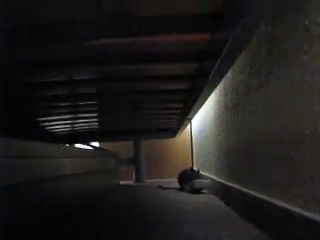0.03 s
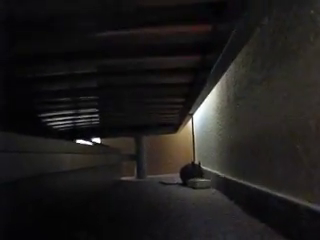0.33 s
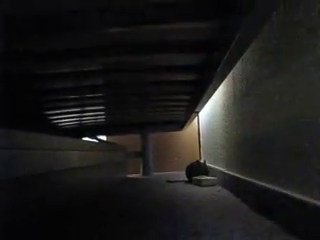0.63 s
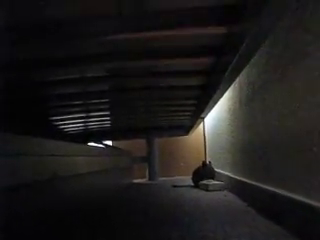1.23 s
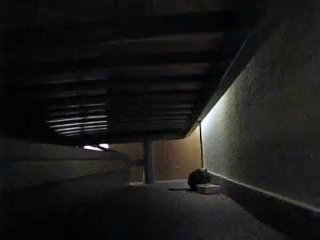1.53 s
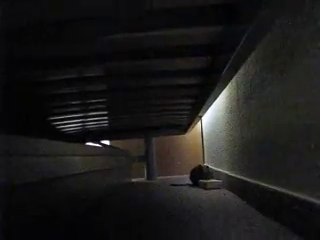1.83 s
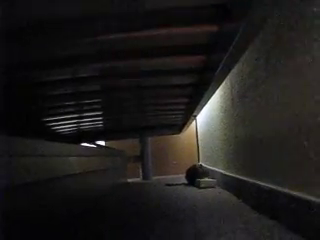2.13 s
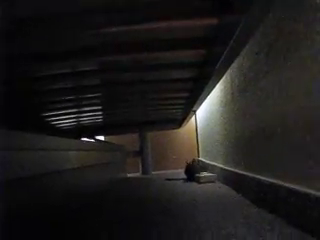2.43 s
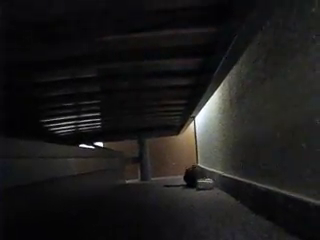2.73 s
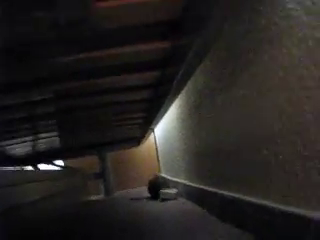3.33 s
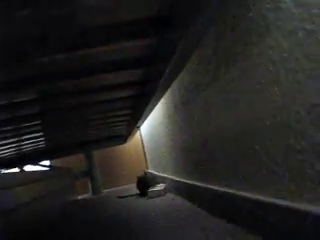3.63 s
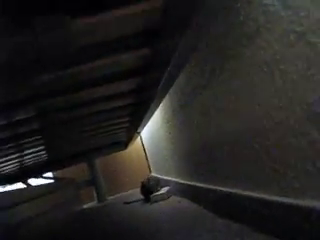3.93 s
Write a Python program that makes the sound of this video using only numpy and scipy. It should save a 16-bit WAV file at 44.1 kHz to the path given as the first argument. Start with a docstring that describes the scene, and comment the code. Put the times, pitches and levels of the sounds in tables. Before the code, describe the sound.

A small rodent nibbles at a box under a bed, making loose runs of dry ticks and crisp rustles. A hand rubs and bumps the floor-level microphone, with one plastic snap near the end, over low rumble and hiss.

```python
"""A small rodent nibbles at a box under a bed, heard from a hand-held camera at floor level.
Its teeth make loose runs of dry ticks, tiny cracks that ring the box, with crisp rustles and fine crackle.
The hand rubs, scuffs and bumps the camera, whose plastic case snaps once near the end.
Under it all lie a low rumble, room hum, hiss and the camera's faint pulsing whine."""
import sys
import numpy as np
from scipy import signal
from scipy.fft import rfft, irfft
from scipy.io import wavfile
from scipy.ndimage import uniform_filter1d

SR = 44100
rng = np.random.default_rng(int(sys.argv[2]) if len(sys.argv) > 2 else 0)


def wav_out(sig):
    """Save sig, one row per channel (or a flat mono array), as 16-bit PCM at SR to the path in sys.argv[1]."""
    wavfile.write(sys.argv[1], SR, np.round(np.clip(np.atleast_2d(sig).T, -1, 1) * 32767).astype(np.int16))


N = 176400

# Tone colours of the noises. Each row: frequency in Hz, relative strength in dB.
AIR_COLOUR = [(30, -18.5), (70, 0), (150, -6.5), (260, -10.5), (380, -14), (540, -18), (750, -14.5),
              (980, -17.5), (1580, -20.5), (2320, -22.5), (4500, -24.5), (7000, -27), (11500, -30),
              (16000, -38.5)]
RUMBLE_COLOUR = [(10, 0.5), (22, -9.5), (31, 4), (42, -12.5), (60, -2), (100, -9), (150, -13), (200, -26.5),
                 (300, -29.5), (1000, -59)]
RUB_COLOUR = [(150, -7), (400, -2.5), (800, 1.5), (1200, -0.5), (1650, -6), (2400, -0.5), (4300, -9.5),
              (7000, -16), (16000, -24)]
TICK_COLOUR = [(150, -31), (400, -18), (650, 4.5), (1100, -6.5), (1750, 0.5), (2200, 3.5), (2700, -3.5),
               (3500, -11.5), (4200, -7.5), (4900, -32), (7000, -28), (9500, -38), (16000, -38)]
EDGE_COLOUR = [(150, -67), (2500, -15), (4000, 2), (5600, -10), (7000, -11), (9500, -14), (16000, -32)]  # the hard edge of brighter ticks
CRISP_COLOUR = [(150, -73), (2500, -4), (4800, 2), (7000, 2.5), (8500, 3), (11500, 10), (16000, -1.5)]  # crackle, and the treble of ticks and rustles
RUSTLE_COLOUR = [(150, -5), (400, -0.5), (650, 0), (1200, 2.5), (1600, -3.5), (2150, 1), (2550, 1),
                 (3050, 5.5), (3550, -4.5), (4100, 1), (6500, -12.5), (9000, -10.5), (16000, -69)]
CASE_CRACK_COLOUR = [(150, -42), (500, -3), (1150, 3), (1700, -10), (2500, 1), (5000, -10), (9000, -12),
                     (16000, -16)]
# How alike left and right are. Each row: frequency in Hz, likeness from 0 (unrelated) to 1 (the same).
LIKENESS = [(60, 0.77), (130, 1), (290, 0.84), (640, 0.49), (1400, 0.47), (3100, 0.062), (16000, 0.022)]
# The room's hum. Each row: pitch in Hz, level in dB.
HUM_TONES = [(31, -57), (48.8, -48.5), (199.4, -59.5)]
# How rumble and rubbing swell and fade. Each row: time in seconds, level in dB.
RUMBLE_LEVELS = [(0, -46), (.4, -49), (.75, -45), (1.2, -54), (1.55, -53), (1.8, -46.5), (2.1, -50.5),
                 (2.35, -44), (2.7, -47.5), (3.08, -41.5), (3.4, -45.5), (3.8, -46.5), (4, -44.5)]
RUB_LEVELS = [(0, -50), (.13, -54.5), (.22, -53.5), (.35, -50.5), (.42, -64), (.62, -58), (.7, -56.5),
              (.92, -53), (1.02, -64), (1.45, -60), (1.86, -55), (1.96, -56), (2.1, -54), (2.4, -59.5),
              (2.52, -52.5), (2.68, -59.5), (3.0, -53), (3.09, -54.5), (3.135, -44), (3.19, -50),
              (3.29, -52.5), (3.48, -57.5), (3.68, -51.5), (3.88, -59.5), (4, -53)]
# Slides of the hand. Each row: start and length in seconds, level in dB, resonance in Hz.
SCUFFS = [(0, 0.27, -56, 754), (0.214, .21, -55, 850), (1.356, 0.33, -63, 960), (3.091, 0.26, -55.5, 1110)]
# Ticks of the teeth. Each row: start in seconds, level in dB, relative treble in dB, leftward lean in dB.
TICKS = [(0.0223, -27, -11, 8), (.6719, -32, -20, 0), (0.7023, -33, -12, -2), (0.7069, -24.5, -10, -4),
         (0.7686, -32, -16, -2), (0.8523, -29, -13, -5), (0.8593, -27.5, -27, 1), (0.8720, -25.5, -13, -1),
         (0.8853, -26, -12.5, 1), (1.1123, -29, -27, 4), (1.242, -38, -35, 13), (1.618, -30, -39, 8),
         (1.6445, -36, -8, -2), (1.6718, -36, -10, -4), (1.694, -39.5, -5, 1), (1.712, -36, -23, -10),
         (1.7434, -42, -11, -6), (1.7894, -38.5, -6, -2), (1.835, -30.5, -20, -2), (1.8498, -26.5, -14, -1),
         (1.8702, -24, -16, -3), (1.8747, -28.5, -27, 1), (1.889, -29.5, -18, -1), (1.9973, -34.5, 1, -2),
         (2.0185, -30, -12.5, -2), (2.0352, -27, -25, 3), (2.0595, -29, -32, -4), (2.0879, -28.5, -35, -8),
         (2.175, -27.5, -19, -4), (2.2452, -31.5, -12, -4), (2.3163, -38, -13, -9),
         (2.3642, -34.5, -20, -4), (2.415, -41, -10, -2), (2.4776, -33, -18, -5), (2.5368, -24.5, -21, -1),
         (2.557, -51, -13, -6), (2.566, -24, -20, -2), (2.6202, -41.5, 0, 2), (2.7363, -46.5, 4, -1),
         (2.769, -32.5, -25, -6), (2.814, -36, 1.5, -4), (2.957, -30, -28, 0), (2.9904, -29.5, -16.5, 1),
         (3.074, -33.5, -12, -4), (3.216, -27, -28, -12), (3.326, -28, -11, -5), (3.3781, -23, -7.5, -3),
         (3.555, -33, -17, -6), (3.7417, -35, -31, 4), (3.9743, -35, -39, -21)]
# Ringing tones of the box and of a knock. Each row: pitch in Hz, seconds to fade 60 dB, strength in dB.
BOX_TONES = [(1890, 0.0034, -15.5), (2270, 0.0096, -9.5), (2810, 0.0082, -11.5)]
KNOCK_TONES = [(668, 0.041, -3), (1220, 0.038, -6.5), (2030, 0.021, -17), (2120, 0.037, -3),
               (2550, 0.025, -9), (2960, .02, -13), (3950, 0.018, -9)]
# Bumps of the hand. Each row: start in seconds, level in dB, pitch in Hz, relative knock in dB.
BUMPS = [(0.157, -34, 188, -4.5), (0.886, -33.5, 175, 4), (2.891, -32, 227, -37), (2.899, -27.5, 112, -35),
         (3.171, -49, 195, 6)]
# Rustles. Each row: start and length in seconds, level in dB, relative treble in dB.
RUSTLES = [(0.262, 0.021, -42, -14), (0.283, 0.011, -47, -1.5), (0.3312, 0.0032, -40, -8),
           (0.684, 0.0097, -47.5, -7), (0.718, 0.009, -39, 2), (0.802, 0.0075, -48.5, -1.5),
           (0.824, 0.01, -53.5, 4), (0.837, 0.044, -53.5, -0.5), (0.8833, 0.0058, -35, -9),
           (1.854, 0.0029, -45, -18), (2.5488, 0.0034, -38, -10), (2.558, 0.0014, -40.5, 7),
           (3.383, 0.0077, -37.5, -10), (3.755, 0.0043, -43.5, -4.5)]
# Tones of the camera case. Each row: pitch in Hz, seconds to fade 60 dB, left and right strength in dB.
CASE_TONES = [(512, 0.018, -23.5, -24), (730, .042, -29, -26.5), (1030, 0.025, -15, -30),
              (1284, 0.025, -15.5, -27), (2045, 0.03, -37, -22.5), (2340, 0.023, -19, -15),
              (2850, 0.0053, -16.5, -8.5), (3230, 0.013, -28, -14), (3900, 0.01, -30, -14.5),
              (4580, 0.012, -26, -10), (5420, .005, -15, -5.5), (6600, 0.011, -30, -21),
              (7840, 0.0026, -18, -8), (9200, 0.0037, -15, -9.5), (12100, .003, -14, -22)]

GRAINS_PER_S, RUB_SPREAD_DB = 2500, 2
TICK_DECAY_S = 0.0011


def undb(db):
    """Turn decibels into a gain."""
    return 10 ** (np.asarray(db) / 20)


def unit(x):
    """Scale to an average power of 1."""
    return x / np.sqrt(np.mean(x ** 2) + 1e-20)


def curve(rows):
    """Gain over time from (seconds, dB) points."""
    return undb(np.interp(np.arange(N) / SR, *np.array(rows).T))


def over_hz(points, size):
    """Join (Hz, value) points on a log-frequency axis."""
    hz, value = np.array(points).T
    return np.interp(np.log(np.arange(size // 2 + 1) * SR / size + 1), np.log(hz), value)


def colour(x, points):
    """Give a sound a tone colour; white noise keeps its power."""
    size = x.shape[-1]
    cepstrum = irfft(np.log(unit(undb(over_hz(points, size)))), size)
    # Folding it makes the filter ring only after a sound, never before.
    cepstrum[1:size // 2] *= 2
    cepstrum[size // 2 + 1:] = 0
    return irfft(rfft(x) * np.exp(rfft(cepstrum)), size)


def stereo_noise(likeness, size):
    """Left and right noise, as alike as asked."""
    mid, side = rfft(rng.standard_normal((2, size)))
    mid, side = mid * np.sqrt((1 + likeness) / 2), side * np.sqrt((1 - likeness) / 2)
    return irfft(np.array([mid + side, mid - side]), size)


def wander(rate):
    """A smooth random drift, about 1 in size."""
    width = int(SR / rate)
    drift = uniform_filter1d(rng.standard_normal(N), width, mode="wrap")
    return unit(uniform_filter1d(drift, width, mode="wrap"))


def grains(rate, spread_db, size):
    """The loudness outline of many tiny, uneven slips."""
    happens = rng.random(size) < rate / SR
    slips = happens * undb(spread_db * np.minimum(rng.exponential(size=size), 5))
    return unit(np.sqrt(np.abs(uniform_filter1d(slips ** 2, size=24))))


def burst(shape, points, likeness=0.59):
    """Coloured stereo noise with the outline and energy of a shape."""
    noise = shape * stereo_noise(likeness, len(shape))
    return unit(colour(noise, points)) * np.sqrt(np.mean(shape ** 2))


def ring(t, hz, fade_s):
    """A struck tone that falls 60 dB in fade_s."""
    t = np.maximum(t, 0)
    return np.sin(2 * np.pi * hz * t) * np.exp(-np.log(1000) * t / fade_s)


def thin_bass(x, below_hz=328):
    """Thin out the bass that a small object cannot give off."""
    return signal.sosfilt(signal.butter(2, below_hz, "high", fs=SR, output="sos"), x)


def add(out, start, sound):
    """Mix a sound in at its time."""
    i = max(int(start * SR), 0)
    out[:, i:i + sound.shape[-1]] += sound[..., :N - i]


def background(air_db=-51, waver_db=0.5):
    """Hissing room air, handling rumble and a wavering hum, a little stronger on the left."""
    t = np.arange(N) / SR
    air = undb(air_db) * unit(colour(stereo_noise(over_hz(LIKENESS, N), N), AIR_COLOUR))
    rumble = curve(RUMBLE_LEVELS) * unit(colour(stereo_noise(0.94, N), RUMBLE_COLOUR))
    hum = np.zeros(N)
    for hz, db in HUM_TONES:
        peak = undb(db + waver_db * wander(11)) * np.sqrt(2)
        hum += peak * np.sin(2 * np.pi * hz * t + 0.59 * wander(2.2))
    return (air + rumble + hum) * undb([[.7], [-.7]])


def whine(hz=7867, db=-61.5, frames_per_s=29.97, on_share=0.53):
    """The camera's electronics whine in one short burst per picture frame."""
    t = np.arange(N) / SR
    frames = frames_per_s * (t - .007)
    is_on = np.cos(2 * np.pi * frames) > np.cos(np.pi * on_share)
    flip = (-1.) ** np.floor(frames + .5)  # every other burst is upside down
    return undb(db) * uniform_filter1d(is_on * flip, size=40) * np.sin(2 * np.pi * hz * t)


def rubbing(flutter_db=1.5):
    """The hand rubs the camera: soft, grainy friction that swells and fades."""
    slips = stereo_noise(over_hz(LIKENESS, N), N) * grains(GRAINS_PER_S, RUB_SPREAD_DB, N)
    flutter = undb(flutter_db * np.tanh(wander(86)))
    return unit(colour(slips, RUB_COLOUR) * flutter) * curve(RUB_LEVELS)


def scuffs():
    """The hand slides: grainy friction through one hollow resonance."""
    out = np.zeros((2, N))
    for start, length, db, hz in SCUFFS:
        size = int(length * SR)
        slips = stereo_noise(0.89, size) * grains(900, RUB_SPREAD_DB, size)
        hollow = signal.iirpeak(hz, Q=1.75, fs=SR)
        sound = unit(signal.lfilter(*hollow, signal.lfilter(*hollow, slips)))
        add(out, start, undb(db) * sound * signal.windows.tukey(size, .5))
    return out


def ticks(t, attack_s=0.0004, tail_s=0.011, delay_s=0.000992, pitch_scatter=0.066):
    """Each bite is a millisecond crack that briefly rings the box, at slightly different pitches."""
    out = np.zeros((2, N))
    decay = np.exp(-t / TICK_DECAY_S) + undb(-15.5) * np.exp(-t / tail_s)
    shape = np.minimum(t / attack_s, 1) * decay
    for start, db, treble_db, lean_db in TICKS:
        box = sum(undb(tone_db) * ring(t, hz * (1 + pitch_scatter * rng.standard_normal()), fade_s)
                  for hz, fade_s, tone_db in BOX_TONES)
        # Brighter ticks ring the box less and, up to a limit, have a harder edge.
        box *= undb(-0.32 * max(treble_db + 25, 0))
        crack = undb(-10) * burst(shape, TICK_COLOUR)
        edge = undb(6.5 + min(treble_db, -14.5)) * burst(shape, EDGE_COLOUR)
        treble = undb(treble_db) * burst(shape, CRISP_COLOUR)
        lean = undb([[lean_db / 2], [-lean_db / 2]])
        add(out, start + delay_s, undb(db) * ((box + crack + edge) * lean + treble))
    return out


def bumps(t, thud_s=0.071):
    """The hand bumps the camera: a low thud and a dry, hollow knock."""
    out = np.zeros((2, N))
    knock = thin_bass(sum(undb(db) * ring(t, hz, fade_s) for hz, fade_s, db in KNOCK_TONES))
    for start, db, hz, knock_db in BUMPS:
        thud = ring(t, hz, thud_s) - undb(-3) * ring(t, 1.5 * hz, thud_s / 2)
        add(out, start, undb(db) * (thud + undb(knock_db) * knock))
    return out


def rustles(t, attack_s=0.00074, release_s=0.0032):
    """Each rustle is a brief crowd of tiny slips that rises, holds and dies away."""
    out = np.zeros((2, N))
    for start, length, db, treble_db in RUSTLES:
        shape = np.minimum(t / attack_s, 1) * np.exp(-np.maximum(t - length, 0) / release_s)
        slips = unit(shape * grains(GRAINS_PER_S, 1.5, len(t))) * np.sqrt(np.mean(shape ** 2))
        body = burst(slips, RUSTLE_COLOUR)
        treble = undb(treble_db) * burst(slips, CRISP_COLOUR)
        add(out, start, undb(db) * (body + treble))
    return out


def crackle(t, from_s=1.8, to_s=3.25, breaks_per_s=36, loudest_db=-48.5, range_db=8):
    """Tiny bright breaks come at random while the animal chews."""
    breaks = (rng.random(N) < breaks_per_s / SR) * undb(loudest_db - range_db * rng.random(N))
    time = np.arange(N) / SR
    chewing = (time > from_s) & (time < to_s)
    shape = signal.fftconvolve(breaks * chewing, np.exp(-t / TICK_DECAY_S))[:N]
    return burst(shape, CRISP_COLOUR)


def snap(t, start_s=3.6109, left_lag_s=0.000286, crack_decay_s=0.0068):
    """The plastic case snaps beside the right microphone and rings briefly."""
    out = np.zeros((2, N))
    tones = np.zeros((2, len(t)))
    for k, (hz, fade_s, left_db, right_db) in enumerate(CASE_TONES):
        left = undb(left_db) * ring(t - left_lag_s, hz, fade_s)
        right = undb(right_db) * ring(t, hz, fade_s)
        tones += (-1) ** k * np.array([left, right])
    crack = undb(-28) * burst(np.exp(-t / crack_decay_s), CASE_CRACK_COLOUR)
    add(out, start_s, undb(-2) * thin_bass(tones) + crack)
    return out


def under_bed(x, echo_db=-15, fade_s=0.092):
    """The space under the bed adds a faint, short echo."""
    t = np.arange(SR // 2) / SR
    tail = colour(rng.standard_normal((2, len(t))), [(200, -16), (800, -38), (3000, -5.5), (12000, -14.5)])
    tail *= np.exp(-np.log(1000) * t / fade_s)
    tail /= np.sqrt(np.sum(tail ** 2) / 2)
    return x + undb(echo_db) * signal.fftconvolve(x, tail, axes=1)[:, :N]


def scene():
    """Mix the nibbling and its echo with the handling noises and the background."""
    t = np.arange(8192) / SR  # seconds within one short sound
    nibbling = under_bed(ticks(t) + rustles(t) + crackle(t))
    handling = snap(t) + bumps(t) + rubbing() + scuffs()
    return nibbling + handling + background() + whine()


def record(dry, top_hz=16100):
    """The camera cuts off the highest treble."""
    return signal.sosfilt(signal.ellip(10, .2, 80, top_hz, fs=SR, output="sos"), dry)


dry = scene()
out = record(dry)
wav_out(out)
```